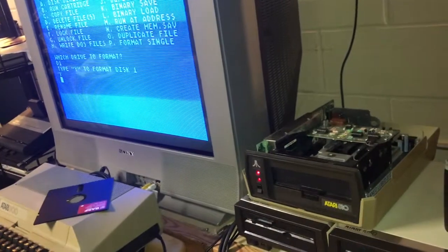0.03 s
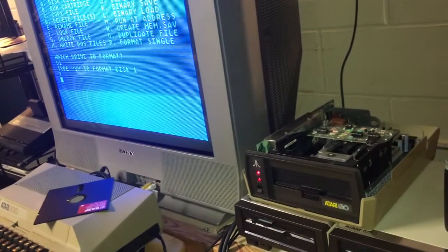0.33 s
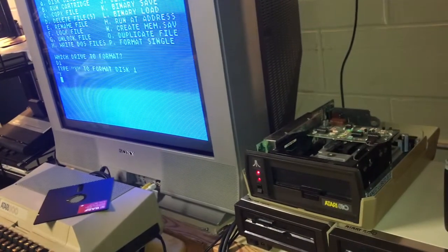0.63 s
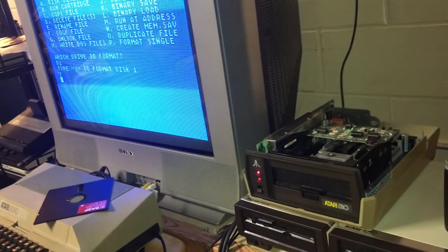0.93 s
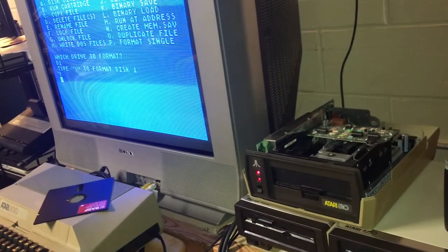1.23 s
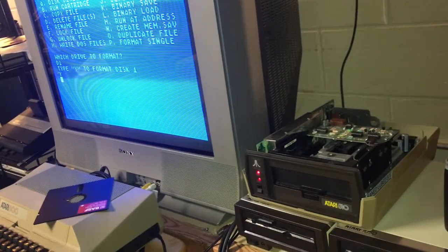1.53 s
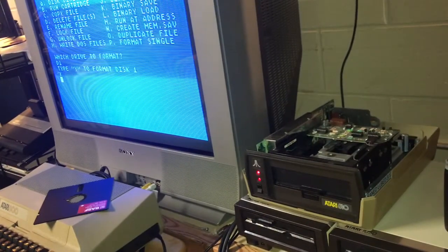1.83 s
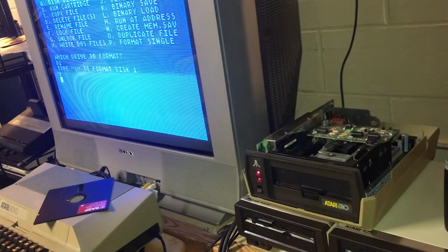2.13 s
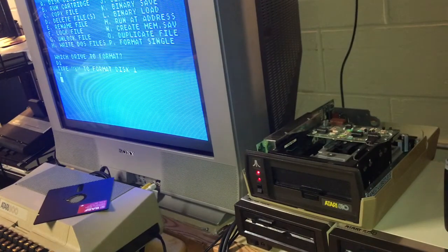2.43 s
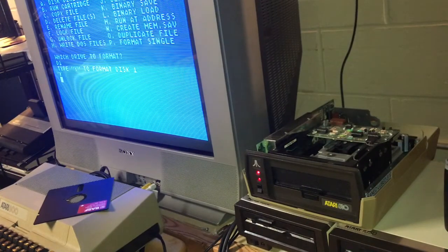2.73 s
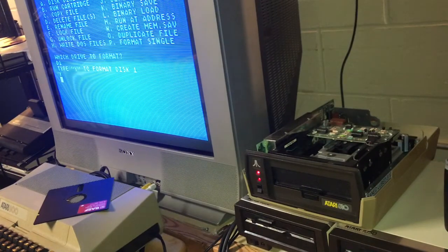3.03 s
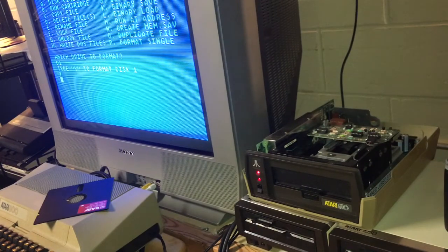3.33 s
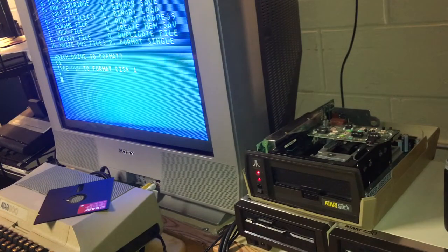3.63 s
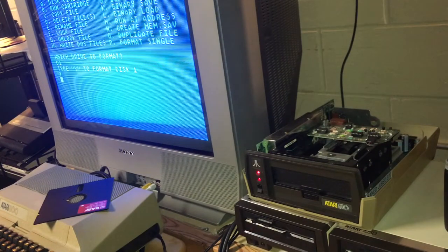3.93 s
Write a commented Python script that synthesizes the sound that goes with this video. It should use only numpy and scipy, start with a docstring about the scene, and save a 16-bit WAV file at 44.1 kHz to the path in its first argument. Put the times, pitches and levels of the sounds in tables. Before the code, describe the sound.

A floppy disk drive steps its head in ten quick pairs of low clunks, each with a click and a brief hollow rattle. The pairs come at about 0.1, 0.5, 0.8, 1.3, 1.6, 2.1, 2.4, 2.9, 3.2 and 3.8 seconds, with three faint ticks around 1 second. Steady motor hum, soft hiss and a monitor's very high whistle run throughout, in a small room with slight echo.

```python
"""A floppy drive formats a disk

The drive lies open on a desk in a small room. Its motor hums, the disk hisses in its sleeve and a
picture tube whistles beside it. The head moves from track to track in pairs of steps: each step
clicks, shoves the chassis (the drive's body) into a low clunk and stops with a rattle.
"""
import sys
import numpy as np
from scipy import signal
from scipy.fft import rfft, irfft
from scipy.io import wavfile

SR = 44100
rng = np.random.default_rng(int(sys.argv[2]) if len(sys.argv) > 2 else 0)


def pcm_store(signal):
    """Save signal as 16-bit PCM."""
    levels = np.round(np.clip(np.atleast_2d(signal), -1, 1) * 32767)
    wavfile.write(sys.argv[1], SR, levels.astype(np.int16).T)


N = 176400
TIME = np.arange(N) / SR

# tone colour of the hiss: (frequency [Hz], relative level [dB])
HISS_SHAPE = [(15, -64), (25, -12.5), (49, -2), (106, -3), (139, 6), (158, -2.5), (191, 2), (213, -8),
              (243, 1), (286, -8), (363, -9), (427, -1), (462, -10.5), (543, -7.5), (673, -6.5), (790, -7),
              (1580, -10.5), (1860, -4.5), (2300, -10.5), (2780, -18.5), (3010, -14), (5140, -16.5),
              (7680, -21.5), (12800, -19), (15000, -57)]
# the motor's hum and whine, plus a few wider bands of high hiss:
# (frequency [Hz], width [Hz], level [dB])
MOTOR_AND_HISS_BANDS = [(147, 10, -78), (1650, 18, -70), (1818, 19, -72), (2496, 15, -75.5),
                        (2773, 75, -74), (3671, 59, -75.5), (5150, 150, -74.5), (6950, 610, -75),
                        (7900, 16, -92), (9100, 300, -81), (10960, 620, -81), (12100, 40, -76)]
# loudness of the tube's whistle: (time [s], level [dB])
WHISTLE_LEVELS = [(0.0, -49.5), (0.22, -50), (0.27, -51.5), (1.34, -49.5), (1.5, -51.5), (1.76, -47),
                  (1.87, -49.5), (2.42, -49), (2.44, -47), (2.84, -49), (3.19, -48), (3.56, -50.5),
                  (3.93, -49), (4.0, -51.5)]
# faint tones beside the whistle: (offset [Hz], relative level [dB])
SIDE_TONES = [(-60, -14), (41, -23)]
# steps of the head: (time [s], start click [dB], shove delay [ms], shove [dB], stop delay [ms],
# stop force [signed share of the shove], swing [Hz], stop click [dB], knock [dB])
HEAD_STEPS = [ (.0969, -41, 0.13, -35.5, 6.8, 1.57, 182, -38.5, -47),
              (.1740, -38, 1.62, -28.5, 6, -0.43, 193, -65, -62),
              (0.4892, -39.5, 1.95, -39, 4.8, 2.5, 186, -47.5, -39),
              (0.564, -36.5, 1.4, -31.5, 9.2, 0.9, 180.6, -61, -49),
              (0.8011, -39.5, 3.9, -40, 6.5, 3, 191.5, -61, -36.5),
              (0.8756, -37.5, 2.68, -31, 9.2, 0.86, 201, -56, -55),
              (1.3018, -39, 1.8, -38, 7.7, 1.44, 205, -41, -39),
              (1.3767, -39, 3.4, -33.5, 10.05, 1.35, 198, -52.5, -72),
              (1.6146, -42.5, 0.75, -35.5, 4.55, -0.38, 279, -45.5, -38),
              (1.6887, -39, 3.8, -30.5, 7.4, 0, 181, -67, -51),
              (2.1154, -39.5, 1.7, -39, 9.8, 0.97, 299, -50.5, -40),
              (2.1896, -45, 2.4, -35, 8.77, 1.63, 196, -79, -43.5),
              (2.4279, -37.5, 0.11, -33.5, 6.2, 1.66, 186, -44.5, -48),
              (2.5043, -40, 1.67, -31.5, 11, 0.93, 173, -54.5, -62),
              (2.9291, -38, 1.67, -33, 9.8, -0.36, 206, -41.5, -37.5),
              (3.0050, -41.5, 3.65, -33, 10.2, 1.16, 200, -78, -49),
              (3.2416, -39, 0.15, -30.5, 6.34, 0.84, 199.6, -41, -50),
              (3.3148, -43, 3.72, -32, 10.6, 1.17, 194, -67, -45.5),
              (3.8023, -40, 0.17, -32, 11, 0.8, 215, -43, -40),
              (3.8764, -44.5, 2.95, -29.5, 7.6, -0.15, 185, -71, -45)]
# low tones of the clunk, from the rocking chassis and a long, low ring of the room:
# (frequency [Hz], relative level [dB], ring time [s]); a ring time is the time to fade by 60 dB
CLUNK_TONES = [(89, -2.5, 0.02), (141.1, -26, 0.43), (232.8, 1.5, 0.084), (341.2, -6, 0.07)]
# tones of the hollow frame: (frequency [Hz], relative level [dB], ring time [s])
FRAME_TONES = [(266, -12, 0.12), (344.6, -1, 0.069), (404, -7.5, 0.076), (491, 5, 0.052), (553, -16, 0.19)]
# tones of the carriage that holds the head, and of its rails:
# (frequency [Hz], relative level [dB], ring time [s], extra level at a stop [dB])
CARRIAGE_TONES = [(586.5, -4.5, 0.055, -4), (780, -5.5, 0.049, 3), (874, -4, 0.018, 0.5),
                  (964, -6, 0.044, 5), (1080, 2, 0.027, -11), (1259.4, 1, 0.022, 3.5),
                  (1390, -2.5, 0.027, -6), (1533, -7.5, 0.034, 3), (1696, -3, 0.029, 1.5),
                  (1854, -5.5, 0.045, -8), (1932, -8.5, 0.035, -2), (2272, -6, 0.015, 1.5),
                  (2860, -20.5, 0.025, 3.5), (3746, -5.5, 0.018, 3.5), (4760, -15, 0.015, -3),
                  (6340, -15.5, 0.015, -1)]
# click brightness in the first and second step of a pair: (start [dB/octave], stop [dB/octave])
CLICK_TILTS = [(-.5, 0.2), (.8, 0.5)]
# sound from the back of the chassis (flipped), then off desk, screen and wall:
# (delay [ms], strength [share])
ECHO_PATHS = [(3.77, -0.76), (7.68, 0.39), (18.33, 0.33), (29.5, 0.099), (38.14, 0.18), (42.38, -0.099)]
# faint stray ticks: (time [s], level [dB])
STRAY_TICKS = [(0.972, -48), (1.078, -42), (1.128, -45)]

CLICK_LAG_MS, STOP_LEAD_MS = 0.4, 1.19   # the stop click comes just before its force peaks


def from_db(db):
    """Turn decibels into a gain."""
    return 10 ** (np.asarray(db) / 20)


def clicks(times, sizes):
    """One sharp kick at each time."""
    out = np.zeros(N)
    np.add.at(out, np.clip(np.round(np.asarray(times) * SR).astype(int), 0, N - 1), sizes)
    return out


def ring(x, hz, ring_s):
    """Each kick in x starts a fading tone as strong as the kick."""
    decay, angle = np.exp(-np.log(1000) / (ring_s * SR)), 2 * np.pi * hz / SR
    return signal.lfilter([0, np.sin(angle)], [1, -2 * decay * np.cos(angle), decay ** 2], x + 1e-18)


def ring_tones(x, tones):
    """Several tones ring at once, every second one flipped."""
    return sum((-1) ** k * from_db(db) * ring(x, hz, ring_s) for k, (hz, db, ring_s) in enumerate(tones))


def shaped_noise(gain_at):
    """Noise of average power 1, shaped by a gain at each frequency."""
    hz = np.maximum(np.arange(N // 2 + 1) * SR / N, 1)
    noise = irfft(rfft(rng.standard_normal(N)) * gain_at(hz), N)
    return noise / np.sqrt(np.mean(noise ** 2))


def disk_hiss(level_db=-57.5):
    """The steady hiss of the room and of the disk turning in its sleeve."""
    hz, db = np.transpose(HISS_SHAPE)
    return from_db(level_db) * shaped_noise(lambda f: from_db(np.interp(np.log(f), np.log(hz), db)))


def motor_and_high_hiss():
    """Narrow bands of noise make the motor's wavering hum and whine; wider ones add high hiss."""
    return sum(from_db(db) * shaped_noise(lambda f: 1 / (1 + (2 * (f - hz) / width) ** 2))
               for hz, width, db in MOTOR_AND_HISS_BANDS)


def tube_whistle(hz=15699.3, flutter_db=0.2, flutter_hz=7.8):
    """The picture tube whistles at the rate it draws its lines; the loudness wavers a little."""
    main = np.sin(2 * np.pi * hz * TIME)
    sides = sum(from_db(db) * np.sin(2 * np.pi * (hz + offset) * TIME) for offset, db in SIDE_TONES)
    flutter = shaped_noise(lambda f: 1 / (1 + (f / flutter_hz) ** 2))
    level_db = np.interp(TIME, *np.transpose(WHISTLE_LEVELS)) - flutter_db * flutter
    return np.sqrt(2) * from_db(level_db) * (main + sides)


def clunks(swing_ring_s=0.076):
    """Each shove and stop swings the head's motor; this rocks the chassis and sets the room ringing."""
    swing = np.zeros(N + SR)
    for time, _, shove_ms, shove_db, stop_ms, stop_share, hz, _, _ in HEAD_STEPS:
        force = clicks([shove_ms / 1000, stop_ms / 1000], [1, stop_share])[:SR // 4]
        start = int(time * SR)
        swing[start:start + len(force)] += from_db(shove_db) * ring(force, hz, swing_ring_s)
    motion = -ring_tones(swing[:N], CLUNK_TONES)
    return np.diff(motion, prepend=0)   # the sound follows the speed of the motion


def frame_knocks(stop_offset_db=-4.5):
    """The start and the stop of each step make the hollow frame ring."""
    time, _, _, _, stop_ms, _, _, stop_db, knock_db = np.transpose(HEAD_STEPS)
    starts = clicks(time + CLICK_LAG_MS / 1000, from_db(knock_db))
    stops = clicks(time + (stop_ms - STOP_LEAD_MS) / 1000, from_db(stop_db + stop_offset_db))
    return ring_tones(starts + stops, FRAME_TONES)


def shaking(hits, fade_s=0.0051):
    """How hard the carriage shakes: a jump at each hit that dies away fast."""
    return signal.lfilter([1], [1, -np.exp(-1 / (fade_s * SR))], hits + 1e-18)


def carriage_rattle(chatter_per_s=2500, chatter_db=-13.5, snap_hz=3000, snap_db=-16,
                    tilt_centre_hz=1550, spread_db=1.65):
    """The carriage clicks as it starts and stops, and chatters briefly after each click."""
    time, start_db, _, _, stop_ms, _, _, stop_db, _ = np.transpose(HEAD_STEPS)
    times = np.r_[time + CLICK_LAG_MS / 1000, time + (stop_ms - STOP_LEAD_MS) / 1000]
    sizes = from_db(np.r_[start_db, stop_db])
    is_stop = np.repeat([0, 1], len(time))
    tilts = np.tile(np.transpose(CLICK_TILTS), len(time) // 2).ravel()
    tiny_kicks = (rng.random(N) < chatter_per_s / SR) * rng.choice([-1, 1], N)
    # the dry snap of the contact itself
    bursts = shaking(clicks(times, sizes)) * rng.standard_normal(N)
    low_cut = signal.butter(1, snap_hz, "high", fs=SR, output="sos")
    out = from_db(snap_db) * signal.sosfilt(low_cut, bursts)
    for k, (hz, db, ring_s, extra_db) in enumerate(CARRIAGE_TONES):
        strike_db = extra_db * is_stop + tilts * np.log2(hz / tilt_centre_hz)
        strike_db += rng.normal(0, spread_db, len(times))   # no two clicks strike a tone alike
        hits = clicks(times, sizes * from_db(strike_db))
        chatter = from_db(chatter_db) * shaking(hits) * tiny_kicks
        out += (-1) ** k * from_db(db) * ring(hits + chatter, hz, ring_s)
    return out


def near_echoes(x):
    """Sound from the back of the chassis and off nearby surfaces arrives a little later."""
    return sum(share * np.interp(TIME - ms / 1000, TIME, x, left=0) for ms, share in ECHO_PATHS)


def room_tail(x, ring_s=0.9, top_hz=4050, build_s=0.024):
    """The room's many echoes blur into a short, dull tail."""
    t = TIME[:SR // 2]
    tail = signal.sosfilt(signal.butter(2, top_hz, fs=SR, output="sos"), rng.standard_normal(len(t)))
    tail *= np.exp(-np.log(1000) * t / ring_s) * (1 - np.exp(-t / build_s))
    tail /= np.sqrt(np.sum(tail ** 2) * SR / (2 * top_hz))
    return signal.fftconvolve(x, tail)[:N]


def stray_ticks():
    """A few tiny bright ticks, each one quickly fading tone."""
    time, db = np.transpose(STRAY_TICKS)
    return ring(clicks(time, from_db(db)), hz=2660, ring_s=0.0079)


def scene():
    """The head's steps and their echoes over the steady hiss, hum and whistle."""
    low = clunks() + frame_knocks()
    high = carriage_rattle() + stray_ticks()
    echoes = near_echoes(low + 0.59 * high)
    tail = room_tail(from_db(-44) * low + from_db(-15.5) * high)
    return (low + high + echoes + tail + disk_hiss() + motor_and_high_hiss() + tube_whistle())[None]


def record(dry, cutoff_hz=16100):
    """A steep filter cuts off the very highest treble."""
    return signal.sosfilt(signal.ellip(12, 0.1, 80, cutoff_hz, fs=SR, output="sos"), dry)


dry = scene()
out = record(dry)
pcm_store(out)
```